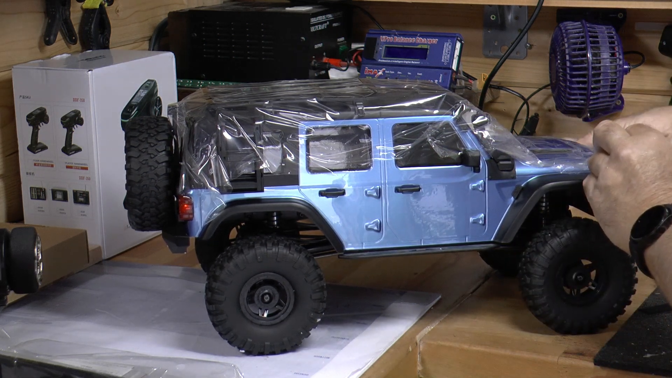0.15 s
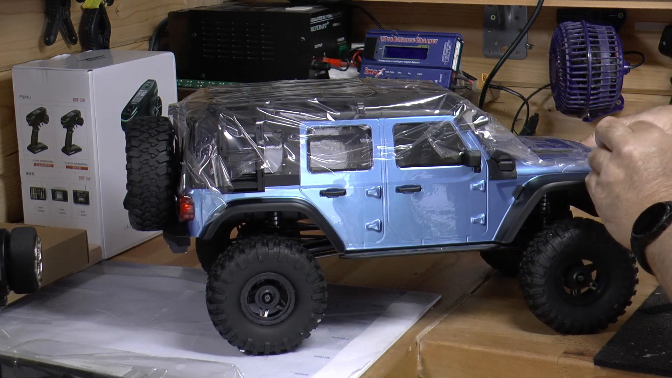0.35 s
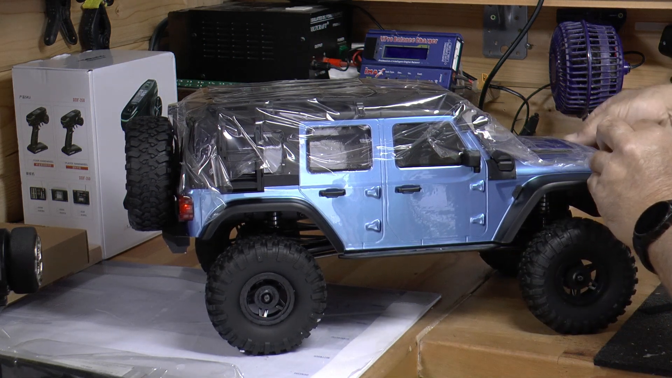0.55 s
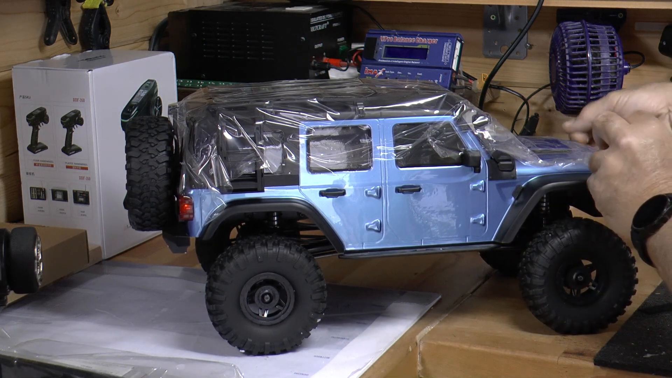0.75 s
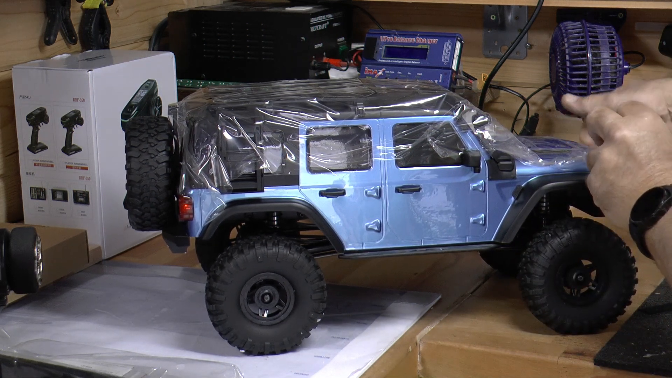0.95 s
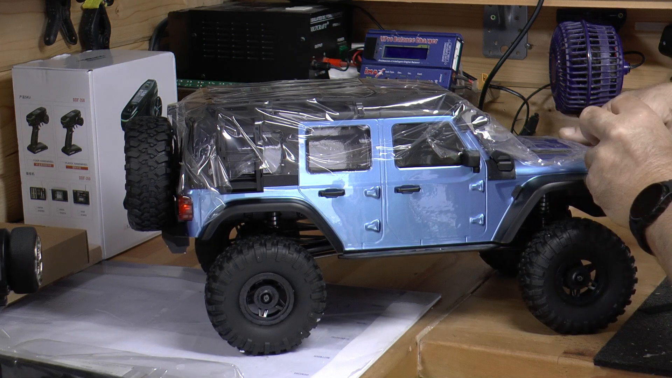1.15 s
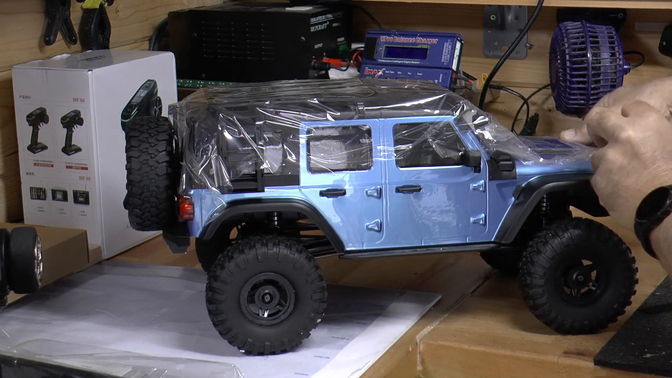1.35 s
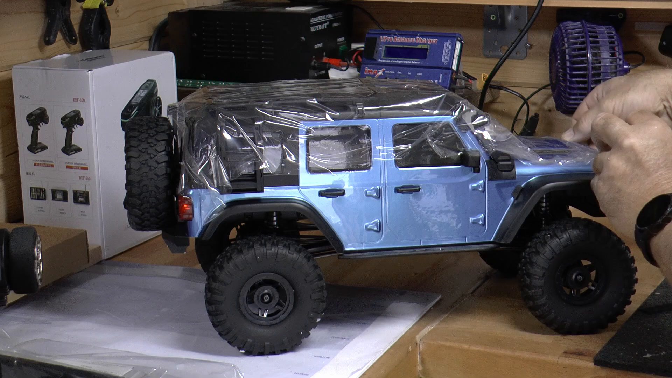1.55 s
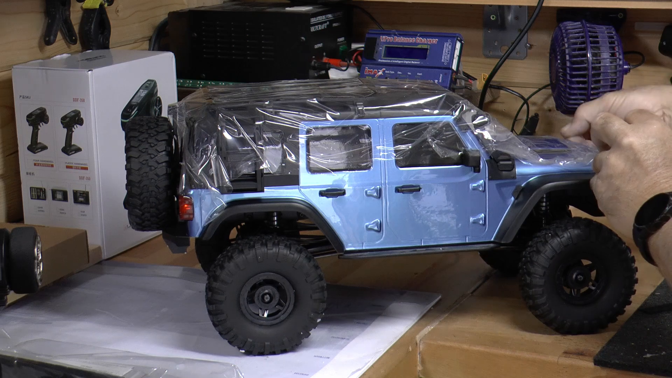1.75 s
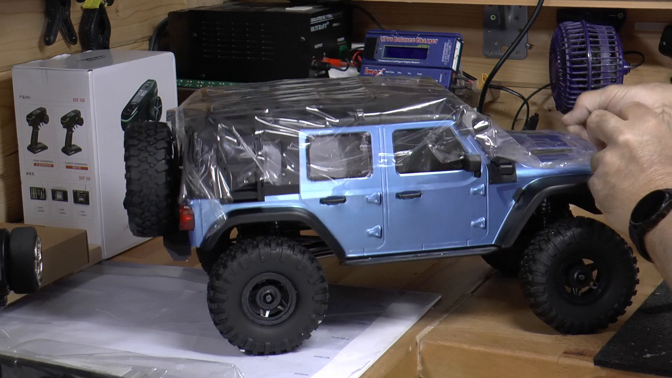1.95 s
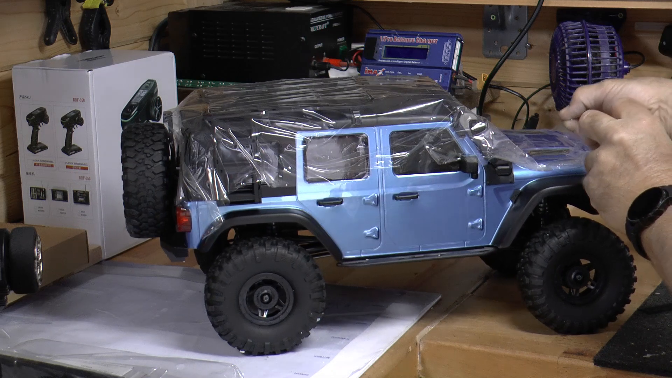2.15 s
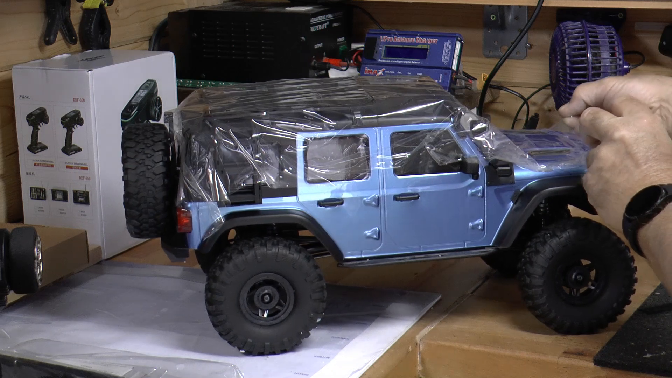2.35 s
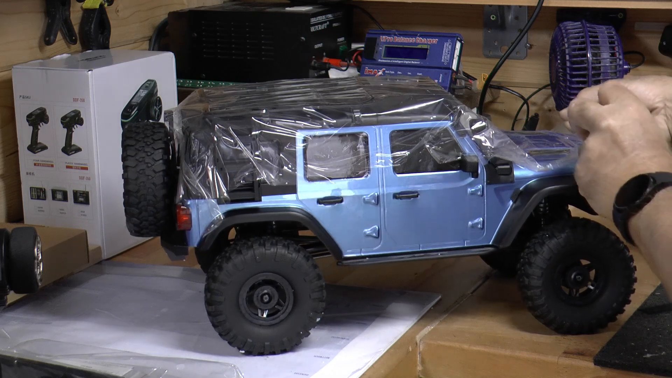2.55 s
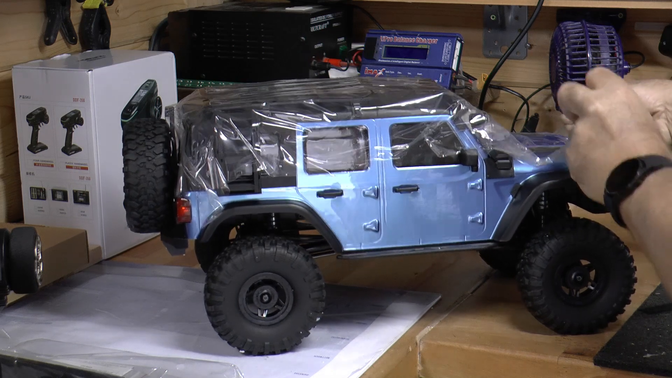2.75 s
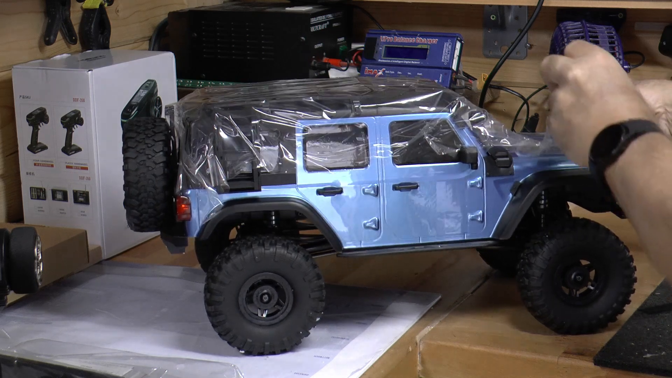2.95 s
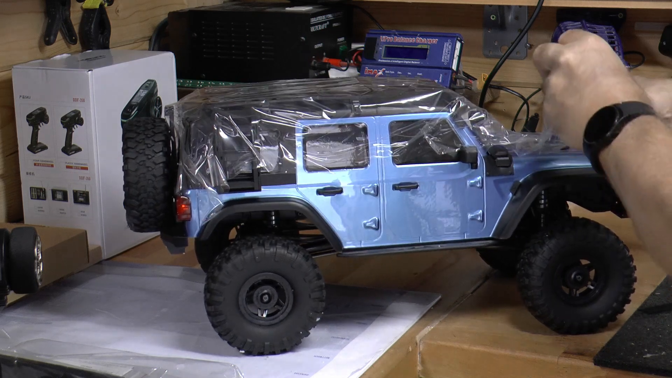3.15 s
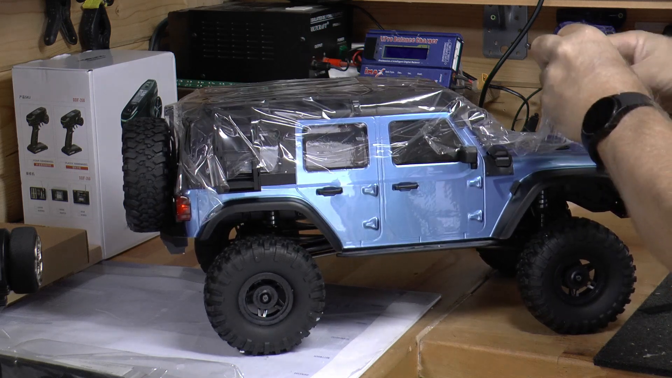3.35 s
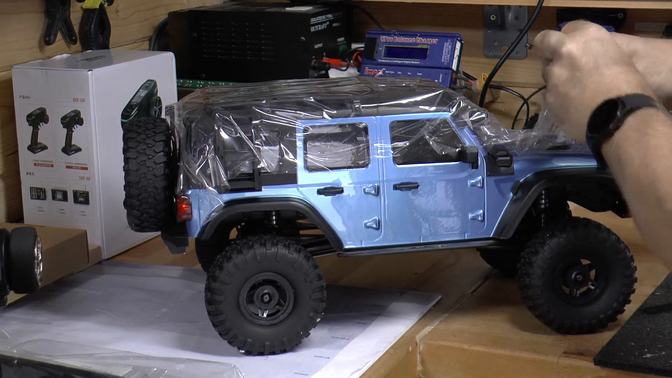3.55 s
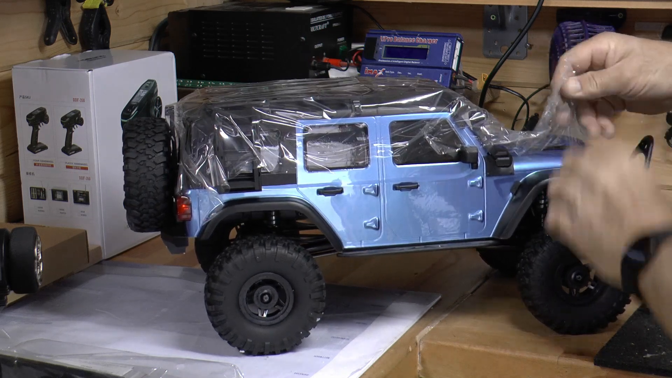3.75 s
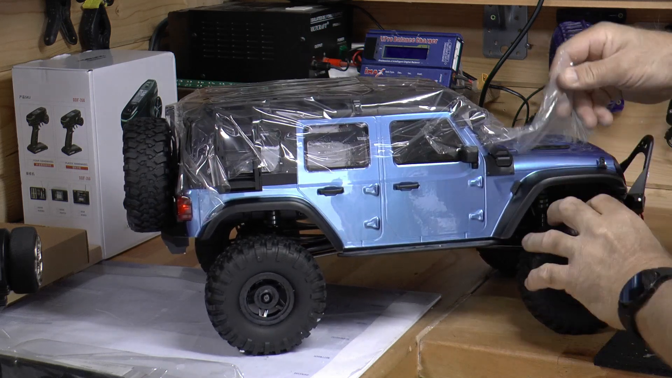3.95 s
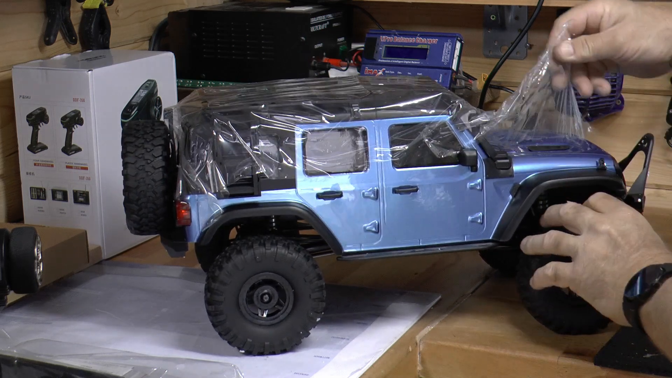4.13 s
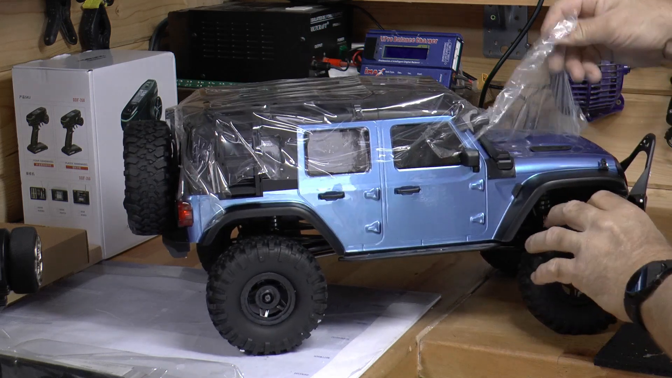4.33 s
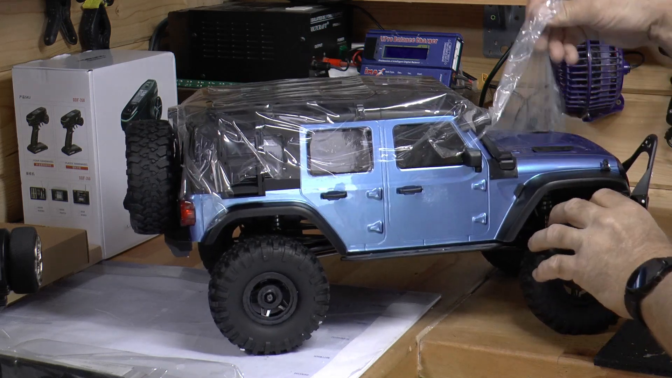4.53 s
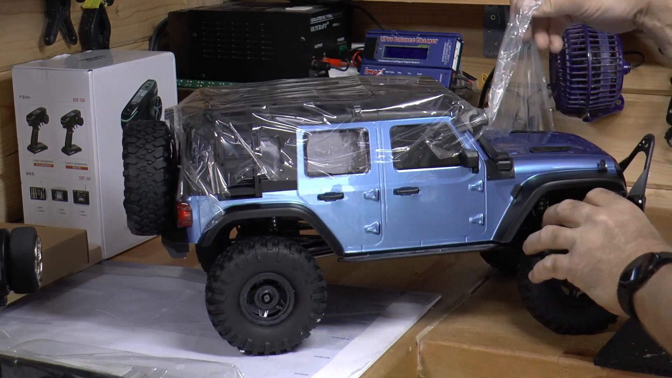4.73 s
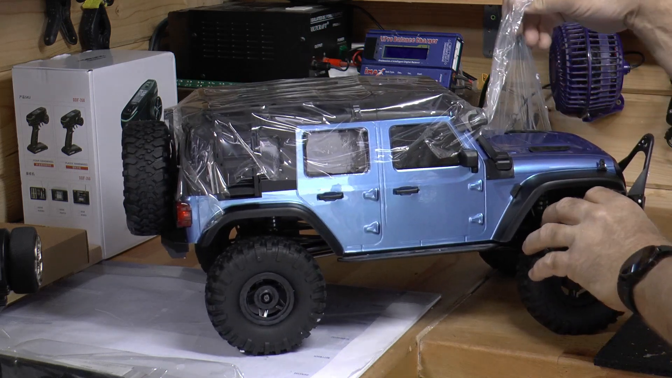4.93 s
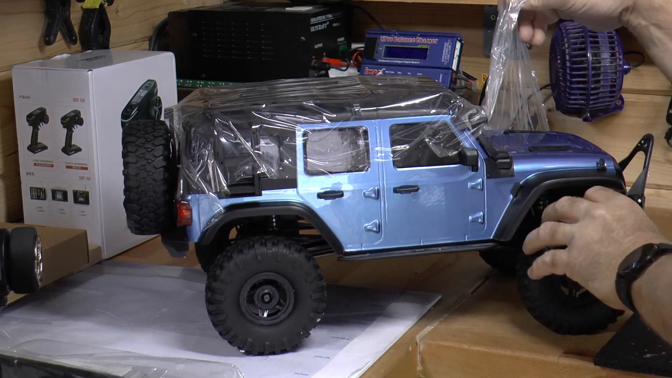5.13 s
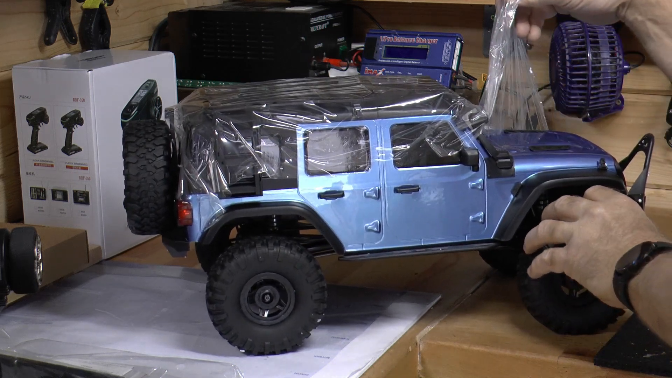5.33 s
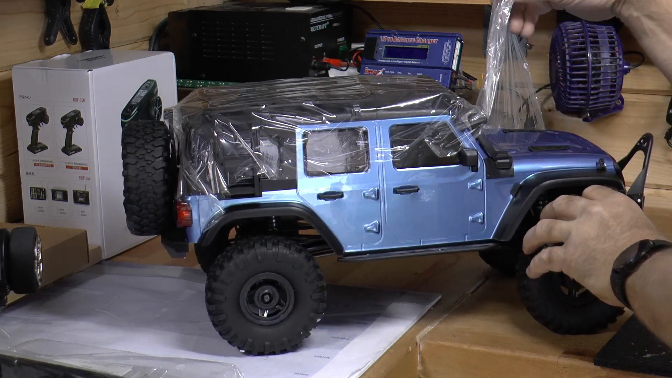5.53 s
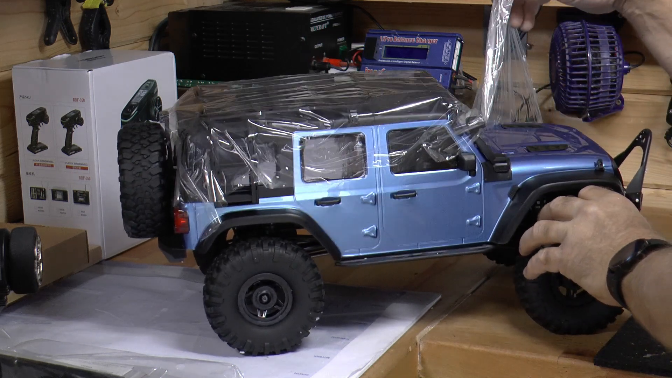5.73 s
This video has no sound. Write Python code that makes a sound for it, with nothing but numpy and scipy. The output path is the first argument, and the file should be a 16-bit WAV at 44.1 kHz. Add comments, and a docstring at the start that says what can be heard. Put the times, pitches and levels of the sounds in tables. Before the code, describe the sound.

Thin plastic film is peeled by hand from a toy truck's hollow plastic body, heard close in a small, quiet workshop with a faint steady hush. For the first two seconds there are light, scattered crackles and ticks, with a couple of tiny rips and soft finger rubs. From about 2 seconds the crinkling thickens into sharp snaps, peaking in a short rip near 2.9 seconds. A softer, even peeling hiss follows from 3.1 to 3.6 seconds. At 4 seconds the busiest stretch begins: bright snaps, quick rips and brief squeaks, with soft hollow bumps from the shell. The taut film then creeps off in rapid, quickening ticks, with a sharp snap and fingernail click at 5 seconds and a loud cluster of snaps around 5.4. It ends with faint ticking and a small squeak.

```python
"""Sharp snaps, short rips, hiss and ticking: thin film is peeled off a plastic toy truck on a bench.
The glue lets go by stick-slip, in single releases or in runs, and the loose film crinkles and squeaks.
Each release is an impulse that excites the film and the modes of the truck's hollow shell.
Fingers rub and bump, a nail clicks on the hood, and a small, quiet workshop adds its reflections."""
import sys
import numpy as np
from scipy import signal
from scipy.fft import rfft, irfft, next_fast_len
from scipy.io import wavfile
from scipy.ndimage import uniform_filter1d

SR = 44100
rng = np.random.default_rng(int(sys.argv[2]) if len(sys.argv) > 2 else 0)


def to_wav(s):
    """Save 16-bit WAV."""
    ch = np.atleast_2d(s).T  # columns
    pcm = np.round(np.clip(ch, -1, 1) * 32767)  # PCM
    wavfile.write(sys.argv[1], SR, pcm.astype(np.int16))


N = 259746
TIME = np.arange(N) / SR
PROGRESS = np.linspace(0, 1, 24)  # fraction of a stroke completed
SHIVER_DB, SHIVER_T60 = -16, 0.08  # the slack film shivers on after a release; t60 is seconds per 60 dB

# Table levels are relative. Against the film's body, bright_db is its treble, boom_db the shell's share.
# Loose film under the fingers, one list per spell: time_s, level_db, treble_db, shell_db
CRINKLE_SPELLS = [
    [(0.0, -54.5, -60, -62), (0.49, -50.5, -65, -62.5), (0.71, -51.5, -47.5, -63.5), (1.16, -56, -69, -63),
     (1.41, -51, -57, -57.5), (1.54, -47, -46.5, -60), (1.88, -48.5, -43, -55.5), (2.1, -43, -58, -49.5)],
    [(2.2, -39, -48, -63), (2.394, -44, -51, -52.5), (2.502, -56, -63, -66), (2.596, -51, -51, -61),
     (2.766, -46, -54, -59), (2.894, -37, -41, -50), (3.1, -40.5, -40.5, -57)],
    [(3.64, -45, -50, -46), (3.752, -49, -44.5, -50.5), (3.874, -45.5, -65, -50), (3.99, -34.5, -34, -53)],
]
# Normal modes of the hollow shell: pitch_hz, level_db, t60_s
SHELL_MODES = [(39.7, -34, 0.069), (84, -31, 0.13), (121, -14, 0.21), (148, -9.5, 0.11),
               (187.4, -10.5, 0.26), (250, -13.5, 0.085), (303, -8.5, 0.18), (330, -4.5, 0.12),
               (370.4, 0, 0.1), (431, -1, 0.087), (460, -4.5, 0.1), (544, -5.5, 0.052), (602, -0.5, 0.053),
               (713.5, 2, 0.046), (815.3, -6.5, .07), (1085, -6, 0.06), (1190, -15.5, 0.15)]


def snaps():
    """Sudden release of elastic energy: a spot of glue lets go or a crease buckles."""
    # Single releases: start_s, level_db, bright_db
    releases = [(0.0538, -30.5, -24), (0.1511, -28.5, -12), (0.215, -21, -28), (0.287, -22.5, -28),
                (0.301, -20, -33), (0.3261, -21, -25), (0.4298, -33, -13), (0.4977, -13, -20),
                (0.5253, -21, -11), (0.635, -28.5, -17), (0.776, -19, -8.5), (0.824, -15, -14.5),
                (0.8662, -14, -11), (1.1065, -29.5, -27), (1.1525, -29, -9), (1.3627, -24, -12.5),
                (1.446, -25, -16.5), (1.6348, -25, -15), (1.752, -26, -2.5), (1.9103, -20, -7),
                (2.0068, -19, -5), (2.0251, -15, -8.5), (2.0758, -14.5, -15.5), (2.1718, -20, -22),
                (2.2793, -15.5, -13.5), (2.3538, -12.5, -15), (2.4069, -14.5, -17), (2.4458, -20, -11),
                (2.466, -7.5, -16.5), (2.4862, -7, -21), (2.5193, -7.5, -19), (2.585, -22, -26),
                (2.6726, -18.5, -13.5), (2.7566, -9.5, -10), (2.8262, -8, -15), (2.8644, -15.5, -20),
                (2.8876, -11.5, -16), (2.9086, -0.5, -22), (2.9959, -11.5, -16), (3.241, -16, -10),
                (3.6314, -12, -17), (3.7687, -28.5, -5.5), (3.8536, -22.5, -17.5), (3.8868, -22.5, -22),
                (3.9925, -4, -16.5), (4.0091, -2.5, -20), (4.0917, -8, -14.5), (4.2242, -21.5, -19),
                (4.2552, -20, -15), (4.4444, -7, -20), (4.4551, -7.5, -21.5), (4.49, -11.5, -34),
                (4.5135, -3, -15.5), (4.6561, -9.5, -13.5), (4.7027, -19, -17), (4.7306, -16, -19.5),
                (4.7684, -14.5, -20), (4.796, -15, -16), (4.82, -10.5, -21), (5.0277, -2.5, -15),
                (5.1631, -16.5, -10.5), (5.2968, -18.5, -10.5), (5.38, -6.5, -14.5), (5.4041, -3, -16),
                (5.4488, -2.5, -22), (5.4628, -3, -20), (5.672, -29, -11), (5.782, -27, -13),
                (5.874, -26, -22.5)]
    return transients(releases, gain_db=-9.5, bright_db=13.5, boom_db=-17, rise_t60=0.0088)


def rips(gain_db, bright_db, boom_db):
    """Fast stick-slip: a dense run of slips holds, then fades, dulls and shifts into the shell."""
    # Fast rips: start_s, length_s, level_db, bright_db, boom_db
    runs = [(0.466, 0.057, -34, -10.5, -10), (0.858, 0.03, -31.5, 3.5, -27), (2.024, 0.024, -29, 4, -18),
            (2.186, 0.074, -32.5, 5.5, -12.5), (2.478, 0.017, -16, -5.5, -37),
            (2.909, 0.082, -19.5, -1, -18), (4.008, 0.13, -21.5, -1, -11), (4.334, 0.1, -20, 0.5, -9),
            (4.513, 0.16, -22.5, 1.5, -8.5), (4.825, 0.062, -24.5, 1, -12.5)]
    fade_db, shift_db = 12 * PROGRESS ** 4.1, 3 * PROGRESS
    strokes = [np.transpose([s + length * PROGRESS, db - fade_db, bright - shift_db, boom + shift_db])
               for s, length, db, bright, boom in runs]
    grain = slips(700, jitter=0.68, spread_db=0.5, t60=0.023, shiver_db=-20.5)
    return pull(strokes, grain, gain_db, bright_db, boom_db, attack_s=0.0063)


def rubs_and_peels(gain_db, bright_db, boom_db):
    """Superposition: fine slips of finger or glue merge into a hiss that swells and ebbs with the hand."""
    # Two soft, dull finger rubs, then the hiss of slow, even peeling:
    # start_s, swell_s, ebb_s, level_db, bright_db, boom_db
    hisses = [(1.105, 0.015, 0.028, -48.5, -16, -11), (1.225, 0.031, 0.029, -52.5, -26, -7),
              (1.575, 0.064, 0.03, -42.5, 1.5, -11), (1.753, 0.028, 0.035, -36.5, 1, -14),
              (1.81, 0.069, 0.02, -33, 2, -10), (3.128, 0.093, 0.15, -38, 1.5, -10.5),
              (3.371, 0.26, 0.015, -36.5, -0.5, -9.5), (5.645, 0.035, 0.07, -34.5, -4.5, -11)]
    swell_db, ebb_db = 8, 11
    strokes = [[(s, db - swell_db, bright, boom),
                (s + swell, db, bright, boom),
                (s + swell + ebb, db - ebb_db, bright, boom)]
               for s, swell, ebb, db, bright, boom in hisses]
    grain = slips(1500, jitter=0.45, spread_db=3.5, t60=0.0012, shiver_db=-21.5)
    return pull(strokes, grain, gain_db, bright_db, boom_db, attack_s=0.0051)


def creeps(gain_db, bright_db, boom_db):
    """Relaxation oscillation: almost regular ticks grow louder and quicker as tension builds."""
    # Taut film creeping off: start_s, length_s, level_db, bright_db, starting_slips_per_s
    taut_pulls = [(4.24, 0.1, -49, -4, 120), (4.46, 0.057, -34.5, -6, 150), (4.679, 0.14, -51, -10, 101),
                  (4.887, 0.128, -43.5, 2, 90), (5.067, 0.32, -42.5, 1.5, 62),
                  (5.519, 0.135, -47.5, -2.5, 74), (5.736, 0.085, -52, -1, 109)]
    build_db, quicken_octaves = 8, 1.1
    tension = PROGRESS ** 4
    strokes, pace = [], []
    for s, length, db, bright, per_s in taut_pulls:
        times = s + length * PROGRESS
        strokes.append([(t, db + build_db * taut, bright, 0) for t, taut in zip(times, tension)])
        pace += zip(times, per_s * 2 ** (quicken_octaves * tension))
    slips_per_s = np.interp(TIME, *np.transpose(sorted(pace)))
    grain = slips(slips_per_s, jitter=0.04, spread_db=1, t60=0.013, shiver_db=-11)
    return pull(strokes, grain, gain_db, bright_db, boom_db, attack_s=0.0027)


def crinkle(gain_db, bright_db, boom_db):
    """Buckling: small creases keep giving way while the film is held."""
    strokes = [[(s, db, treble - db, shell - db) for s, db, treble, shell in spell]
               for spell in CRINKLE_SPELLS]
    grain = slips(300, jitter=0.97, spread_db=6, t60=0.018, shiver_db=-18.5)
    return pull(strokes, grain, gain_db, bright_db, boom_db, attack_s=0.0019)


def creases(per_s, spread_db):
    """Snap-through buckling: faint, randomly timed snaps follow the level of the crinkle."""
    releases = []
    for spell in CRINKLE_SPELLS:
        s, db, treble, _ = np.transpose(spell)
        offset, strength = rng.random((40, 2)).T
        times = s[0] + (np.arange(len(offset)) + offset) / per_s
        level = np.interp(times, s, db) + spread_db * (2 * strength - 1)
        bright = np.interp(times, s, treble - db)
        releases += [row for row in zip(times, level, bright) if row[0] < s[-1]]
    return transients(releases, gain_db=6.5, bright_db=4, boom_db=-15.5, rise_t60=0.0068)


def transients(releases, gain_db, bright_db, boom_db, rise_t60, size=4096):
    """Free decay after an impulse: a crack, a brief hard flutter, then a shiver as the film settles."""
    usual_t60, usual_bright_db, halving_db = 0.028, -16.5, 44
    crack = amp(-3.5) * fade(0.0034, size)
    shiver = amp(SHIVER_DB) * fade(SHIVER_T60, size)
    force = np.zeros((4, N))
    for s, db, bright in releases:
        # bright snaps come from small, stiff patches and die sooner
        t60 = usual_t60 * 2 ** ((usual_bright_db - bright) / halving_db)
        envelope = crack + (fade(t60, size) + shiver) * (1 - fade(rise_t60, size))
        flutter = unit(envelope * rng.standard_normal(size)) * np.linalg.norm(envelope)
        add(force, s, shares(db + gain_db, bright + bright_db, boom_db)[:, None] * flutter)
    return force


def slips(per_s, jitter, spread_db, t60, shiver_db):
    """Incoherent addition: the tiny flutters of the slips sum in power, with a mean near one."""
    pace = per_s * np.ones(N) / SR
    count = int(pace.sum()) + 1
    offset, strength = rng.standard_normal((count, 2)).T
    onsets = np.searchsorted(np.cumsum(pace), np.arange(count) + jitter * offset)
    energy = np.bincount(onsets, amp(spread_db * np.clip(strength, -2, 2)) ** 2, N + 1)[:N]
    decay = fade(t60) + amp(shiver_db) * fade(SHIVER_T60)
    power = through(energy, decay ** 2).clip(0)
    # even out the power over a run of slips, so that the hand sets the level
    mean = uniform_filter1d(power, int(6 / pace.mean()))
    mean = uniform_filter1d(mean, int(3 / pace.mean()))
    return rng.standard_normal(N) * np.sqrt(power / (abs(mean) + 1e-9))


def pull(strokes, grain, gain_db, bright_db, boom_db, attack_s):
    """Amplitude modulation: the hand's strokes shape the slip noise; the film shivers on after each."""
    force = np.zeros((4, N))
    for stroke in strokes:
        s, *columns = np.transpose(stroke)
        span = slice(max(int(s[0] * SR), 0), int((s[-1] + SHIVER_T60) * SR))
        t = TIME[span]
        db, bright, boom = (np.interp(t, s, column) for column in columns)
        envelope = gate(t, s[0], s[-1], attack_s, SHIVER_T60)
        force[:, span] += shares(db + gain_db, bright + bright_db, boom + boom_db) * envelope * grain[span]
    return force


def shares(db, bright_db, boom_db):
    """Division of a force: gains into the shell and the film's low, middle and top range."""
    return amp([db + boom_db, db, db + bright_db / 2, db + bright_db])


def radiate(force, film_db, tug_hz):
    """Source and filter: the force sounds the film; its quick tugs ring mostly the higher shell modes."""
    # Radiation spectrum of the film: frequency_hz, density_db
    film_spectrum = [(100, -24), (500, -18.5), (950, -19.5), (1350, -11), (1700, -4), (2500, -1.5),
                     (4200, 0), (5500, -2), (7200, -2), (8400, -4.5), (9900, -4), (12000, -12),
                     (15000, -17.5), (16500, -38)]
    size = 2 * next_fast_len(N // 2 + 2048, True)
    hz = np.fft.rfftfreq(size, 1 / SR)
    band = read([(2300, 0.11), (4600, 0.59), (10000, 2)], hz)  # crossfade: 0 low, 1 middle, 2 top
    spectrum = sum(rfft(drive, size) * np.clip(1 - abs(band - k), 0, 1)
                   for k, drive in enumerate(force[1:]))
    film = amp(film_db) * through(irfft(spectrum)[:N], colour(film_spectrum))
    tug = signal.lfilter(*signal.butter(1, tug_hz, "high", fs=SR), force[0])
    return film, through(tug, ring(SHELL_MODES))


def squeaks(width_hz):
    """Forced resonance: slips feed one broad mode of a taut strip until it goes slack."""
    # Squeaking strips: start_s, length_s, pitch_hz, level_db
    strips = [(2.022, 0.0047, 9840, -24.5), (2.191, 0.031, 4100, -28), (2.756, 0.0064, 2420, -24.5),
              (3.175, 0.083, 3500, -46), (3.248, 0.068, 4800, -38.5), (4.028, 0.028, 3930, -21),
              (4.09, 0.0083, 1770, -22.5), (4.343, 0.08, 1910, -26.5), (5.672, 0.011, 4060, -30.5),
              (5.674, 0.046, 9190, -42)]
    t = TIME[:8192]
    out = np.zeros(N)
    for s, length, hz, db in strips:
        pole = np.exp((-np.pi * width_hz + 2j * np.pi * hz) / SR)
        buzz = signal.lfilter([1], [1, -pole], rng.standard_normal(len(t))).real
        envelope = gate(t, 0, length, attack_s=0.0012, t60=0.05)
        add(out, s, amp(db) * envelope * buzz / buzz.std())
    return out


def bumps(gain_db, falloff_db, rise_t60, damping_t60):
    """Modal excitation: a soft push rings the modes near the panel's pitch; the finger damps them."""
    # Fingers and tugs bumping the shell: start_s, level_db, panel_hz
    pushes = [(0.33, -41, 370), (0.6, -45, 400), (0.997, -47, 533), (1.387, -43.5, 660), (2.488, -37, 440),
              (2.76, -24.5, 400), (3.417, -29, 258), (3.57, -41, 156), (3.634, -34.5, 376),
              (4.038, -24, 700), (4.11, -24.5, 333), (4.364, -24.5, 430), (4.568, -29.5, 146),
              (4.605, -25, 402), (5.044, -34.5, 158), (5.405, -43, 60), (5.45, -37, 134.8)]
    hz, _, t60 = np.transpose(SHELL_MODES)
    out = np.zeros(N)
    for s, db, panel_hz in pushes:
        mode_db = -falloff_db * np.log2(hz / panel_hz) ** 2
        thud = ring(zip(hz, mode_db, t60)) * (1 - fade(rise_t60)) * fade(damping_t60)
        add(out, s, amp(db + gain_db) * thud / abs(thud).max())
    return out


def nail(gain_db, scrape_t60, damping_t60, size=2048):
    """Friction excitation: a nail or the film's edge skids briefly and rings the well-damped hood."""
    # Picks and flicks on the hood: start_s, level_db
    picks = [(0.326, -41), (0.497, -33.5), (0.829, -40.5), (1.932, -30), (3.423, -42), (5.028, -27.5),
             (5.405, -24)]
    # Normal modes of the hood: pitch_hz, level_db, t60_s
    hood_modes = [(815, -10.5, 0.055), (1140, -1, 0.089), (1260, 0, 0.08), (1375, 2.5, 0.11),
                  (1450, 2.5, 0.033), (1664, -10.5, 0.058), (1855, -3.5, .03), (2670, -8, 0.033)]
    hood = ring(hood_modes) * fade(damping_t60)
    out = np.zeros(N)
    for s, db in picks:
        scrape = fade(scrape_t60, size) * rng.standard_normal(size)
        click = signal.fftconvolve(hood, scrape)
        add(out, s, amp(db + gain_db) * click / abs(click).max())
    return out


def workshop(x, near_db, far_db, side_db, near_t60, far_t60, paths=4):
    """Reflection from bench and shelves, then the room; the paths change as the peeling edge moves."""
    # Spectrum of the difference between left and right: frequency_hz, level_db
    width_spectrum = [(100, 7.5), (700, 7), (1400, -1), (2800, 0.5), (5500, -9), (9000, 2.5), (12000, -77),
                      (16000, -6)]
    mid, side = np.zeros((2, N))
    position = TIME * 23  # crossfades per second, cycling through the paths
    for k in range(paths):
        distance = abs((position - k + paths / 2) % paths - paths / 2)
        part = x * np.cos(np.pi / 2 * np.minimum(distance, 1))
        mid_response = amp(near_db) * echoes(near_t60, 0.0009) + amp(far_db) * echoes(far_t60, 0.0087)
        mid_response[0] += 1  # direct sound
        side_response = echoes(near_t60, 0.0002) + amp(far_db - near_db) * echoes(far_t60, 0.0066)
        mid += through(part, unit(mid_response))
        side += through(part, unit(side_response))
    side = amp(side_db) * through(side, colour(width_spectrum))
    return np.array([mid + side, mid - side])


def echoes(t60, delay_s, per_s=4000, size=8192):
    """Reverberation: sparse reflections of random sign die away exponentially."""
    taps = rng.choice([-1., 1.], size) * (rng.random(size) < per_s / SR)
    return unit(taps * fade(t60) * (np.arange(size) > delay_s * SR))


def air(level_db):
    """Partly coherent noise: the steady hush of the room, much alike on left and right."""
    # Spectrum of the quiet workshop: frequency_hz, density_db
    hush_spectrum = [(15, -32), (25, 8), (242, 7.5), (363, -6), (489, -34), (734, -13), (911, -12),
                     (1940, 0), (4250, -8.5), (5140, -32), (13200, -19), (14800, -29), (16000, -57)]
    # Likeness of left and right: frequency_hz, correlation
    likeness = [(30, 0.7), (120, 0.95), (500, 0.7), (4000, 1), (14000, 0.9)]
    hz = np.fft.rfftfreq(N, 1 / SR)
    left, independent = rfft(rng.standard_normal((2, N))) * amp(read(hush_spectrum, hz))
    correlation = np.clip(read(likeness, hz), 0, 1)
    right = correlation * left + np.sqrt(1 - correlation ** 2) * independent
    hush = irfft(np.array([left, right]), N)
    return amp(level_db) * hush / hush.std()


def ring(modes, size=8192):
    """Modal superposition: damped sinusoids of alternating sign form an impulse response."""
    t = np.arange(size) / SR
    return unit(sum((-1) ** k * amp(db) * fade(t60, size) * np.sin(2 * np.pi * hz * t)
                    for k, (hz, db, t60) in enumerate(modes)))


def colour(points, size=2048):
    """Spectral shaping: an impulse response whose phase is the Hilbert transform of its log gain."""
    hz = abs(np.fft.fftfreq(size, 1 / SR))
    log_gain = np.log(amp(read(points, hz)))
    spectrum = np.exp(np.conj(signal.hilbert(log_gain)))
    return unit(np.fft.ifft(spectrum).real)


def gate(t, start_s, end_s, attack_s, t60):
    """Driven, then free vibration: a linear rise, a hold, and exponential decay after end_s."""
    rise = np.minimum((t - start_s) / attack_s, 1)
    return rise * np.exp(-np.log(1000) * np.maximum(t - end_s, 0) / t60)


def fade(t60, size=8192):
    """Exponential decay by 60 dB in t60 seconds."""
    return np.exp(-np.log(1000) * np.arange(size) / SR / max(t60, 1e-4))


def through(x, response):
    """Convolution with an impulse response."""
    return signal.oaconvolve(x, response)[:N]


def add(mix, start_s, sound):
    """Superposition of a sound on the mix."""
    part = mix[..., max(round(start_s * SR), 0):][..., :sound.shape[-1]]
    part += sound[..., :part.shape[-1]]


def read(points, hz):
    """Interpolation on a log-frequency axis."""
    point_hz, value = np.transpose(points)
    return np.interp(np.log(hz + 1), np.log(point_hz + 1), value)


def unit(x):
    """Normalisation to unit energy."""
    return x / np.sqrt(np.sum(x ** 2) + 1e-20)


def amp(db):
    """Decibels to amplitude ratio."""
    return 10 ** (np.asarray(db) / 20)


def scene():
    """Linear superposition: all releases drive one film and one shell in one room."""
    force = snaps()
    force += rips(gain_db=-1, bright_db=-1, boom_db=-2)
    force += rubs_and_peels(gain_db=-0.5, bright_db=0.5, boom_db=-2)
    force += creeps(gain_db=-1, bright_db=-1.5, boom_db=-14.5)
    force += crinkle(gain_db=-4, bright_db=-3.5, boom_db=3.5)
    force += creases(per_s=8, spread_db=5)
    film, shell = radiate(force, film_db=3.5, tug_hz=197)
    film += squeaks(width_hz=480)
    clicks = nail(gain_db=5.5, scrape_t60=0.03, damping_t60=0.014)
    shell += bumps(gain_db=-1.5, falloff_db=36, rise_t60=0.032, damping_t60=0.82)
    sound = workshop(film + clicks, near_db=-2, far_db=-5, side_db=-17, near_t60=0.042, far_t60=0.16)
    sound += workshop(shell, near_db=-6, far_db=-7.5, side_db=-22, near_t60=0.028, far_t60=0.17)
    balance = amp([[-0.17], [0.17]])
    return sound * balance + air(level_db=-57)


def record(dry):
    """Band limiting: a steep low-pass filter removes the highest treble."""
    cutoff_hz = 16100
    lowpass = signal.firwin(255, cutoff_hz, window=("kaiser", 9), fs=SR)
    return signal.oaconvolve(dry, lowpass[None], "same")


dry = scene()
out = record(dry)
to_wav(out)
```